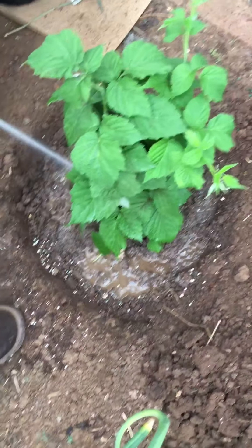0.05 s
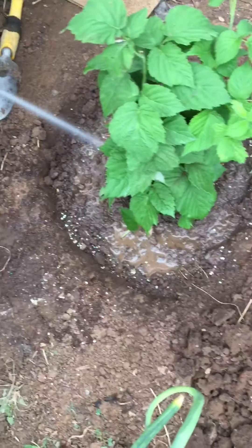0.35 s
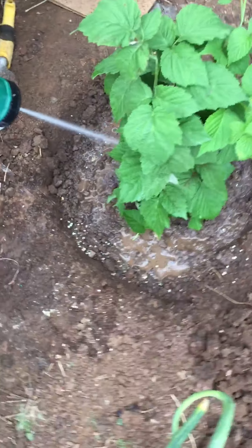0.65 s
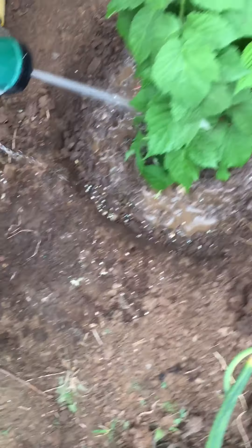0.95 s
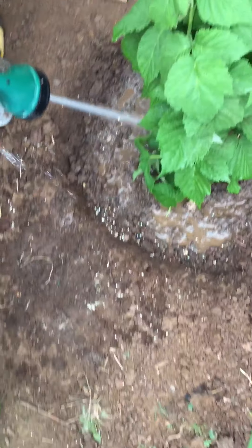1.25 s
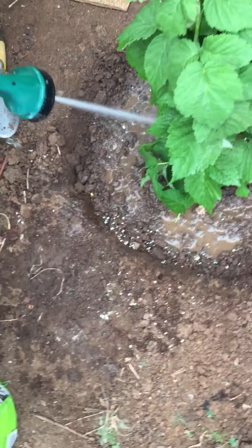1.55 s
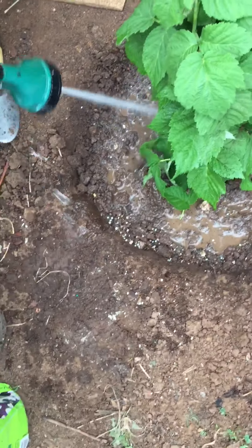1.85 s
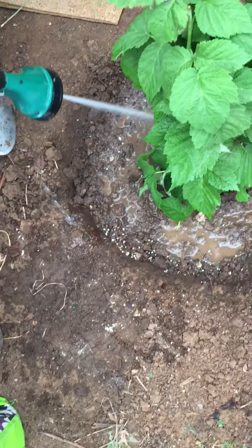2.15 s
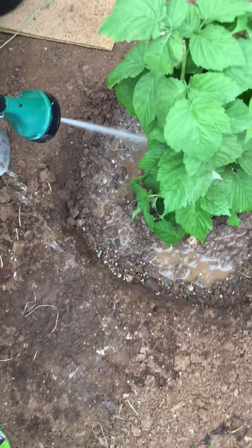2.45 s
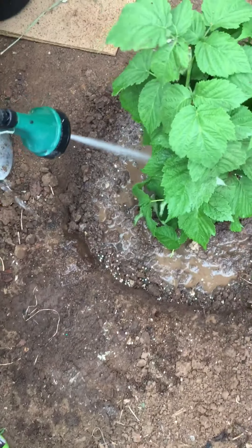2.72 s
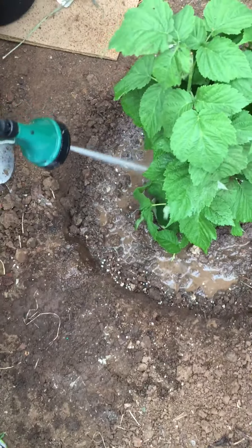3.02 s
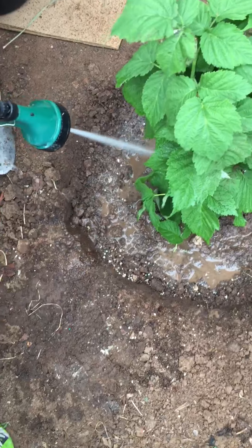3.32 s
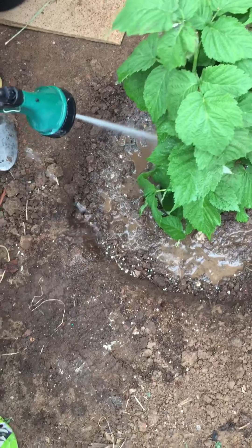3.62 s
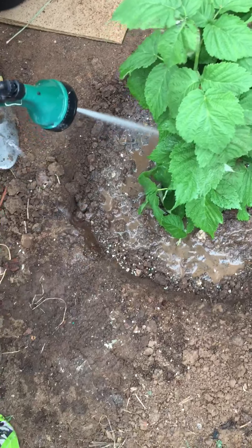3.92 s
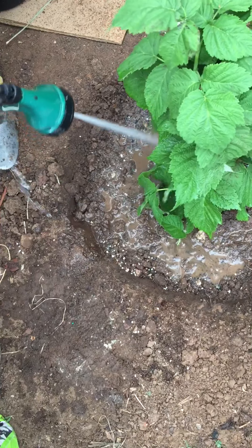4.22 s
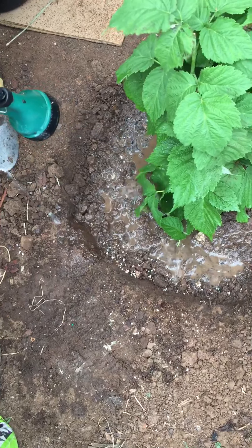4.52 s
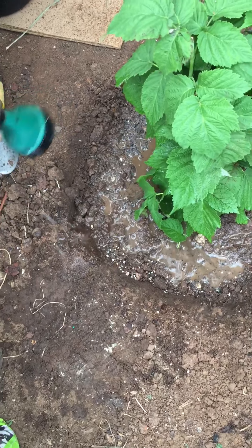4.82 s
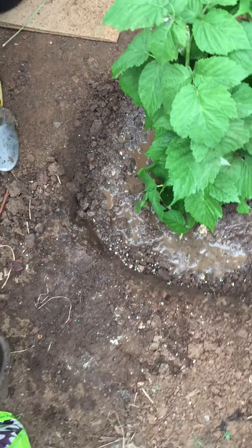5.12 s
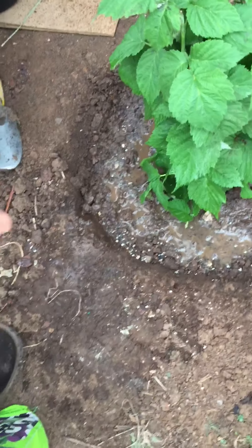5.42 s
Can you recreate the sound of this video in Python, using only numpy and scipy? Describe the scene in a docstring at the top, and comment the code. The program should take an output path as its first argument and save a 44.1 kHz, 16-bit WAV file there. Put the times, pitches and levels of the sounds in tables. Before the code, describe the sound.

A hose sprays water onto soil, bark mulch and leaves, hissing and pattering, then shuts off, leaving a few drips.

```python
"""In a garden, close by, a hose sprays a bed. Thousands of drop impacts a second add up to a hiss on soil
and bark mulch, plop in the mud, set tiny bubbles ringing and drum on broad leaves as the jet swings
over them. The nozzle shuts and the flow dies quickly; a few drips tick over the low outdoor rumble,
and something scuffs and lands softly."""
import sys
import numpy as np
from scipy import signal
from scipy.fft import rfft, irfft
from scipy.io import wavfile
from scipy.ndimage import uniform_filter1d

SR = 44100
rng = np.random.default_rng(int(sys.argv[2]) if len(sys.argv) > 2 else 0)


def dump(signal):
    """Clip the signal to [-1, 1] and save it as 16-bit WAV at the path in sys.argv[1]."""
    limited = np.clip(np.atleast_2d(signal).T, -1, 1)
    pcm = np.round(limited * 32767).astype(np.int16)
    wavfile.write(sys.argv[1], SR, pcm)


N = 250047
TIME = np.arange(N) / SR

# aim of the jet (time [s], share on mulch rather than soil [0-1])
MULCH_SHARE = [(0, 0.73), (.5, 0.89), (.6, 0.01)]
# the hiss swells as the jet swings closer (centre time [s], half width [s], rise [dB])
JET_SURGES = [(0.013, 0.018, 6.5), (0.14, 0.13, 2), (0.645, 0.099, 3.5), (0.968, 0.035, 4), (1.05, .045, 4),
              (1.43, 0.062, 1.5), (1.79, 0.038, 3), (2.12, 0.18, 1.1), (2.92, 0.31, 1.5),
              (3.53, 0.034, 1.6), (4.5, 0.015, 2.5)]
# spectra of drop impacts on soil, mulch, leaves and mud (frequency [Hz], relative level [dB])
SOIL_SPECTRUM = [(150, -28), (500, -21), (720, -10.5), (1100, -4), (1420, -1), (1700, 0), (2600, -1.5),
                 (4400, 0), (5800, -1), (7900, -4.5), (9200, -3.5), (11100, -7), (12600, -9), (15800, -10)]
MULCH_SPECTRUM = [(150, -13.5), (700, -11), (1100, -18), (1300, 1), (1700, -5), (2600, -13), (3400, 0),
                  (4600, -2.5), (5700, -0.5), (6300, -5.5), (8400, -3.5), (11200, -6), (12300, -7.5),
                  (15800, -12)]
LEAF_SPECTRUM = [(200, -32.5), (700, -14.5), (1250, -20), (1550, -3), (1950, -0.5), (2550, 2), (3050, -5.5),
                 (3600, -5), (4100, -27), (6000, -22.5), (12000, -39)]
MUD_SPECTRUM = [(100, -14.5), (200, -0.5), (300, 3.5), (520, -7), (700, 2.5), (950, -1.5), (1300, -8),
                (3000, -31)]
# the jet brushes leaves and sheds water into the mud
# (start [s], duration [s], drumming level [dB], plopping level [dB])
LEAF_SWEEPS = [(0.2, 0.057, -33, -36), (0.26, .075, -52, -39.5), (0.62, .125, -31.5, -60),
               (0.867, 0.038, -32, -51), (1.025, 0.053, -33.5, -61), (1.297, 0.066, -32.5, -55),
               (1.4, .09, -37, -60), (1.589, 0.041, -31.5, -53), (1.645, 0.025, -28.5, -41.5),
               (1.728, 0.033, -33, -57), (1.83, 0.015, -28, -53), (1.883, 0.24, -36.5, -54),
               (2.224, .1, -30.5, -67), (2.616, 0.033, -29.5, -47), (2.823, 0.17, -36, -51.5),
               (3.079, 0.038, -32, -46.5), (3.22, .04, -38, -58), (3.305, 0.061, -27, -42),
               (3.613, .05, -29.5, -62), (3.664, .1, -25.5, -44.5), (3.968, .05, -38, -62),
               (4.029, 0.11, -24.5, -44.5), (4.22, 0.019, -29, -36), (4.305, 0.027, -31.5, -41),
               (4.397, 0.048, -24, -44), (4.493, .03, -29, -55)]
# big single drops on a leaf (time [s], peak level [dB])
LEAF_SLAPS = [(0.1987, -14), (0.484, -16), (0.705, -12), (0.7149, -7), (0.9741, -31), (1.0826, -11.5),
              (1.622, -23), (1.6703, -11), (1.7404, -13), (1.8445, -9.5), (2.6418, -20), (3.3242, -17.5),
              (3.3716, -15), (3.6728, -9), (3.7366, -2), (3.9723, -21), (4.0468, -8), (4.2027, -14),
              (4.2379, -15), (4.3201, -23)]
# chips and hollows under the jet
# (centre time [s], duration [s], frequency [Hz], nominal bandwidth [Hz], level [dB])
HOLLOW_MODES = [(0.062, 0.059, 3400, 450, -28), (0.163, 0.091, 910, 400, -37), (0.19, 0.22, 7270, 300, -36),
                (.25, .5, 8450, 300, -52), (0.41, 0.34, 3590, 700, -30.5), (0.526, 0.11, 890, 400, -37.5),
                (0.628, 0.15, 6800, 500, -30), (0.69, 0.077, 6000, 700, -29), (1.016, 0.31, 970, 440, -41),
                (1.02, 0.2, 4060, 400, -31.5), (1.422, 0.083, 930, 397, -42),
                (1.658, 0.11, 5330, 445, -33.5), (1.787, 0.22, 970, 447, -42),
                (2.108, 0.19, 4550, 350, -34.5), (2.485, 0.028, 6460, 1800, -28.5),
                (2.637, 0.078, 3780, 1500, -32), (2.8, 0.14, 6100, 500, -37), (3.103, 0.13, 4000, 500, -40),
                (3.527, 0.083, 9600, 2000, -32), (3.93, 0.076, 4380, 700, -33)]
# drips after the nozzle shuts (time [s], peak level [dB], frequency [Hz], bandwidth [Hz])
LAST_DRIPS = [(4.5864, -37, 12400, 7000), (4.631, -56, 8340, 900), (4.678, -44, 13400, 4000),
              (4.712, -56, 3330, 300), (4.7256, -40.5, 10300, 2200), (4.9197, -35, 14000, 5000),
              (4.934, -46, 10500, 5000), (5.201, -43, 11600, 4000), (5.209, -39, 14000, 3950),
              (5.222, -33.5, 9600, 5000), (5.271, -51, 7000, 900), (5.2925, -49, 12000, 6000)]
# spectra of the scuff and of the rustle that ends it (frequency [Hz], relative level [dB])
SCUFF_SPECTRUM = [(300, -1), (1000, -7), (1900, -0.5), (3500, -4.5), (6000, -2.5), (8600, -7),
                  (10500, -8.5), (15500, -19)]
RUSTLE_SPECTRUM = [(200, -14.5), (340, -8), (450, -0.5), (600, 1), (920, -6), (1120, -4.5), (1480, -0.5),
                   (1700, -14), (2400, -13), (4000, -34)]
# envelope of the rustle (time [s], level [dB])
RUSTLE_ENVELOPE = [(5.425, -79), (5.459, -44), (5.472, -47), (5.49, -53), (5.535, -62), (5.555, -51),
                   (5.58, -65), (5.67, -66)]
# low bumps and soft knocks (time [s], peak level [dB], frequency [Hz], bandwidth [Hz])
SOFT_BLOWS = [(1.033, -35, 65.4, 30), (1.41, -36.5, 60.5, 16), (2.56, -35.5, 98.5, 29),
              (4.929, -32.5, 89, 44), (5.32, -39, 252, 120), (5.47, -34, 1250, 380), (5.48, -51, 586, 13)]
# spectra of distant rumble and moving air (frequency [Hz], relative level [dB])
RUMBLE_SPECTRUM = [(20, -43), (35, -16.5), (55, -2.5), (70, -4.5), (84, 1.5), (100, -5), (125, -4),
                   (170, -7.5), (240, -21.5), (400, -53.5)]
AIR_SPECTRUM = [(150, 3.5), (300, 4.5), (430, -4), (600, 0.5), (1020, 0), (1250, -2.5), (1450, -5),
                (2000, -13), (4000, -17), (7000, -23.5), (11000, -26.5), (15800, -33)]
# notches in the microphone's response (frequency [Hz], bandwidth [Hz], gain [dB])
MIC_NOTCHES = [(1250, 390, -4), (3260, 76, -3), (4915, 540, -6), (10220, 520, -5)]

# base levels: ground hiss, stray drops on leaves, plopping on soil and on mulch
SPRAY_DB, STRAY_DB, MUD_SOIL_DB, MUD_MULCH_DB = -27.5, -39.5, -54.5, -42.5
HALF_CAUGHT_DB = -18  # drumming level at which the leaves intercept half the jet's power
SHUT_S, SHUT_DB_PER_S, SETTLE_DB, SETTLE_DB_PER_S = 4.508, 949.5, -26, 160
SCUFF_S, SCUFF_DB, SCUFF_SAG_DB_PER_S = 5.316, -49.5, 21
RUMBLE_DB, AIR_DB = -49, -58
CUTOFF_HZ = 15850


def ground_spray(clumps):
    """Shot noise: dense, fine impacts hiss on soil; fewer, more uneven ones crackle on mulch."""
    mulch = on_mulch()
    soil_hits = coloured(drops(per_s=22000, spread_db=2.5) * amp(0.79 * clumps), SOIL_SPECTRUM)
    mulch_hits = coloured(drops(per_s=14000, spread_db=3.5) * amp(1.6 * clumps), MULCH_SPECTRUM)
    splash = np.sqrt(1 - mulch) * soil_hits + np.sqrt(mulch) * mulch_hits
    return jet() * patchy(splash, depth_db=2.0)


def jet():
    """Interception: the ground receives the surging spray, less the power that the leaves catch."""
    surge_db = sum(db * np.exp(-((TIME - s) / width) ** 2) for s, width, db in JET_SURGES)
    caught_ratio = (leaf_strength() / amp(HALF_CAUGHT_DB)) ** 2
    return flow() * amp(SPRAY_DB + surge_db) / np.sqrt(1 + caught_ratio)


def flow():
    """Two-stage decay: once the valve closes, the flow dies quickly and the last water settles slowly."""
    since = np.maximum(TIME - SHUT_S, 0)
    return np.maximum(amp(-SHUT_DB_PER_S * since), amp(SETTLE_DB - SETTLE_DB_PER_S * since))


def on_mulch():
    """Division of power between two surfaces: the share of the jet that lands on mulch."""
    return np.clip(np.interp(TIME, *np.transpose(MULCH_SHARE)), 0, 1)


def leaf_drumming(clumps):
    """Impulse response: a well-damped leaf answers each drop with a dull tap; big drops stand out."""
    taps = coloured(drops(per_s=3600, spread_db=3.0) * amp(clumps), LEAF_SPECTRUM)
    out = leaf_strength() * taps
    slap = impact(LEAF_SPECTRUM)
    for s, db in LEAF_SLAPS:
        add(out, s, amp(db) * slap / abs(slap).max())
    return out


def leaf_strength():
    """Excitation of the leaves: steady stray drops plus the sweeps of the jet."""
    return swept(STRAY_DB, [drumming_db for _, _, drumming_db, _ in LEAF_SWEEPS])


def swept(steady_db, peaks_db):
    """Incoherent addition: the powers of a steady splash and of every sweep sum to one envelope."""
    power = amp(steady_db) ** 2
    for (s, length, *_), db in zip(LEAF_SWEEPS, peaks_db):
        power = power + (amp(db) * held(s, length, rise_s=0.022, fall_s=0.016)) ** 2
    return flow() * np.sqrt(power)


def mud_plops(clumps):
    """Low-frequency shot noise: heavy drops plop into wet soil, most where mulch holds the water."""
    steady_db = MUD_SOIL_DB + (MUD_MULCH_DB - MUD_SOIL_DB) * on_mulch()
    strength = swept(steady_db, [plopping_db for *_, plopping_db in LEAF_SWEEPS])
    plops = coloured(drops(per_s=2400, spread_db=2.0) * amp(0.9 * clumps), MUD_SPECTRUM)
    return strength * patchy(plops, depth_db=1.3)


def hollows():
    """Resonance: drops excite one chip or hollow while the jet passes over it."""
    out = np.zeros(N)
    for s, length, hz, width_hz, db in HOLLOW_MODES:
        passing = np.cos(np.pi * np.clip((TIME - s) / length, -.5, .5))
        ringing = convolved(drops(per_s=2000, spread_db=5.0), ring(hz, width_hz * 1.7, size=512))
        out += amp(db) * passing * unit_rms(ringing)
    return out


def bubbles():
    """Bubble resonance: tiny air pockets ping as drops strike standing water."""
    out = np.zeros(N)
    for hz in np.geomspace(900, 9000, num=36):
        hz *= rng.uniform(.97, 1.03)
        pings = convolved(drops(per_s=5.4, spread_db=3), ring(hz, width_hz=30 + hz / 90, size=2048))
        out += pings * min(hz / 2500, 1)  # the low pings are weaker
    return amp(-12.5) * jet() * unit_rms(out)


def drips():
    """Transient excitation: each last drip, an impulse with a brief spatter, rings a wet leaf."""
    out, t = np.zeros(N), np.arange(1024) / SR
    for s, db, hz, width_hz in LAST_DRIPS:
        spatter = 0.14 * rng.standard_normal(len(t)) * np.exp(-t / 0.0019)
        tick = np.convolve(spatter + (t == 0), ring(hz, width_hz, size=1024))
        add(out, s, amp(db) * tick / abs(tick).max())
    return out


def scuff():
    """Friction noise: dense tiny clicks make a gritty rub that ends in a dull rustle."""
    rub = amp(SCUFF_DB - SCUFF_SAG_DB_PER_S * (TIME - SCUFF_S))
    rub *= held(SCUFF_S, length_s=0.153, rise_s=0.051, fall_s=0.03)
    grit = patchy(coloured(drops(per_s=15000, spread_db=4.5), SCUFF_SPECTRUM), depth_db=3.0)
    rustle_db = np.interp(TIME, *np.transpose(RUSTLE_ENVELOPE), left=-120, right=-120)
    rustle = coloured(drops(per_s=3700, spread_db=2.5), RUSTLE_SPECTRUM)
    return rub * grit + amp(rustle_db) * rustle


def thuds():
    """Damped vibration: each soft blow excites one mode that soon dies away."""
    out = np.zeros(N)
    for s, db, hz, width_hz in SOFT_BLOWS:
        add(out, s, amp(db) * ring(hz, width_hz))
    return out


def soaking():
    """Heavily damped resonances: the wet bed ticks faintly as water sinks in."""
    ticks = sum(convolved(drops(per_s=4.5, spread_db=3), ring(hz, width_hz=hz / 3, size=512))
                for hz in np.geomspace(5000, 14000, num=8))
    return amp(-79.5) * unit_rms(ticks)


def garden_echoes(x, t60_s, size=16384):
    """Scattering: plants and ground return sparse, decaying echoes after 3 ms."""
    t = np.arange(size) / SR
    reflections = rng.standard_normal(size) * (rng.random(size) < .1)
    tail = reflections * amp(-60 * t / t60_s) * (t > .003)
    return convolved(x, tail / np.linalg.norm(tail))


def background():
    """Ambient noise: distant rumble and faint moving air, each drifting in level."""
    rumble = coloured(rng.standard_normal(N), RUMBLE_SPECTRUM, size=16384)
    air = coloured(rng.standard_normal(N), AIR_SPECTRUM)
    return amp(RUMBLE_DB + 2.0 * wander(rate_hz=5)) * rumble + amp(AIR_DB + .8 * wander(rate_hz=3)) * air


def drops(per_s, spread_db):
    """Poisson process: impulses at random moments, many small and few large."""
    strength = amp(spread_db * np.minimum(rng.exponential(1, N), 4))
    return strength * rng.choice([-1, 1], N) * (rng.random(N) < per_s / SR)


def impact(spectrum, size=2048):
    """Minimum phase: the most compact causal pulse with the given spectrum."""
    hz, db = np.transpose(spectrum)
    log_hz = np.log(abs(np.fft.fftfreq(size, 1 / SR)) + 1)
    log_gain = np.log(amp(np.interp(log_hz, np.log(hz), db)))
    response = np.exp(np.conj(signal.hilbert(log_gain)))
    return np.fft.ifft(response).real[:size // 2]


def coloured(x, spectrum, size=2048):
    """Linear filtering: every impulse in x takes on the spectrum; rms 1."""
    return unit_rms(convolved(x, impact(spectrum, size)))


def ring(hz, width_hz, size=8192):
    """Damped oscillation with a soft onset; the envelope peaks at 1."""
    t = np.arange(size) / SR
    damping = np.pi * width_hz * t
    return damping * np.exp(1 - damping) * np.sin(2 * np.pi * hz * t)


def patchy(x, depth_db):
    """Spectral modulation: colour drifts as new crumbs and chips are struck; rms 1."""
    frames = signal.stft(x, nperseg=512, noverlap=384)[2]
    broad, narrow = rng.standard_normal((2, *frames.shape))
    # smoothing over frequency, then time: broad brief patches and narrow lasting ones
    broad = unit_rms(uniform_filter1d(uniform_filter1d(broad, size=7, axis=0), size=14, axis=1))
    narrow = unit_rms(uniform_filter1d(uniform_filter1d(narrow, size=3, axis=0), size=40, axis=1))
    gain = amp(depth_db * unit_rms(broad + 1.3 * narrow))
    return unit_rms(signal.istft(frames * gain, nperseg=512, noverlap=384)[1][:N])


def wander(rate_hz):
    """Low-pass noise: random fluctuation mostly below the given rate; rms 1."""
    hz = np.fft.rfftfreq(N, 1 / SR)
    return unit_rms(irfft(rfft(rng.standard_normal(N)) / (1 + (hz / rate_hz) ** 2), N))


def held(start_s, length_s, rise_s, fall_s):
    """Envelope: a linear rise around the start, a hold, then exponential decay."""
    attack = np.clip((TIME - start_s) / rise_s + .5, 0, 1)
    return attack * np.exp(-np.maximum(TIME - start_s - length_s, 0) / fall_s)


def convolved(x, response):
    """Convolution with an impulse response, cut to the scene's length."""
    return signal.oaconvolve(x, response)[:N]


def add(mix, s, sound):
    """Superposition of a sound on the mix at time s."""
    part = mix[max(round(s * SR), 0):][:len(sound)]
    part += sound[:len(part)]


def amp(db):
    """Amplitude ratio for a level in decibels."""
    return 10 ** (np.asarray(db) / 20)


def unit_rms(x):
    """Normalisation to rms 1."""
    return x / np.sqrt(np.mean(x ** 2) + 1e-20)


def scene():
    """Superposition in mono; clumps in the jet modulate hiss, drumming and plops together."""
    clumps = wander(rate_hz=66)
    water = ground_spray(clumps) + leaf_drumming(clumps) + mud_plops(clumps)
    water += hollows() + bubbles() + drips() + soaking()
    mono = water + scuff() + thuds() + amp(-19) * garden_echoes(water, t60_s=0.089) + background()
    return np.array([mono, mono])


def record(dry):
    """Frequency response of the microphone: narrow notches, then a low-pass band limit."""
    for hz, width_hz, gain_db in MIC_NOTCHES:
        band = signal.lfilter(*signal.iirpeak(hz, hz / width_hz, fs=SR), dry)
        dry = dry + (amp(gain_db) - 1) * band
    low_pass = signal.firwin(511, CUTOFF_HZ, window=("kaiser", 9), fs=SR)
    return signal.oaconvolve(dry, low_pass[None], "same")


dry = scene()
out = record(dry)
dump(out)
```